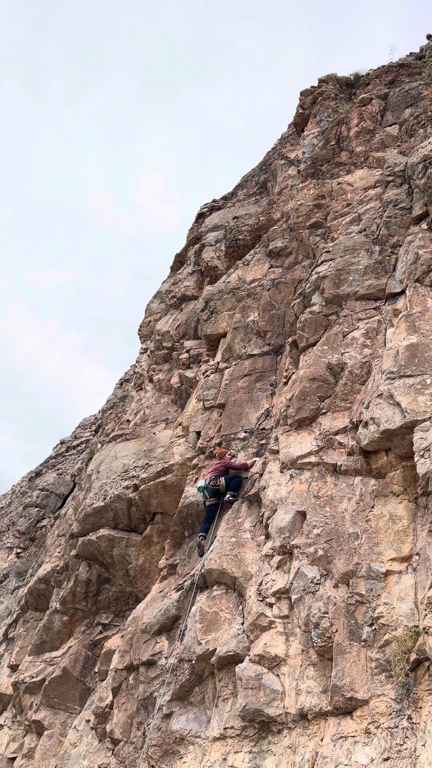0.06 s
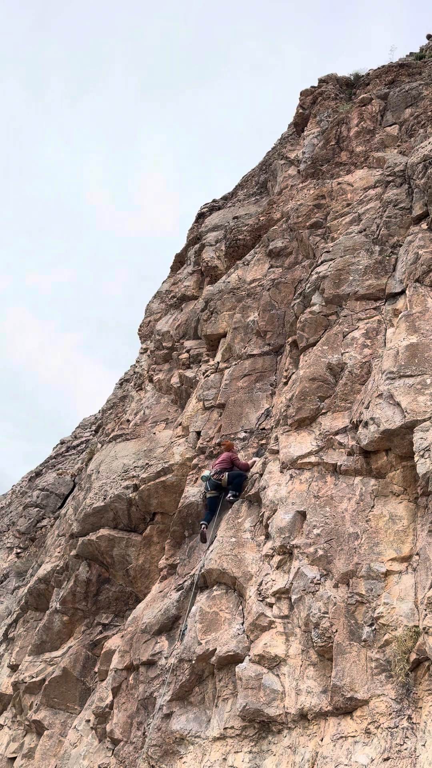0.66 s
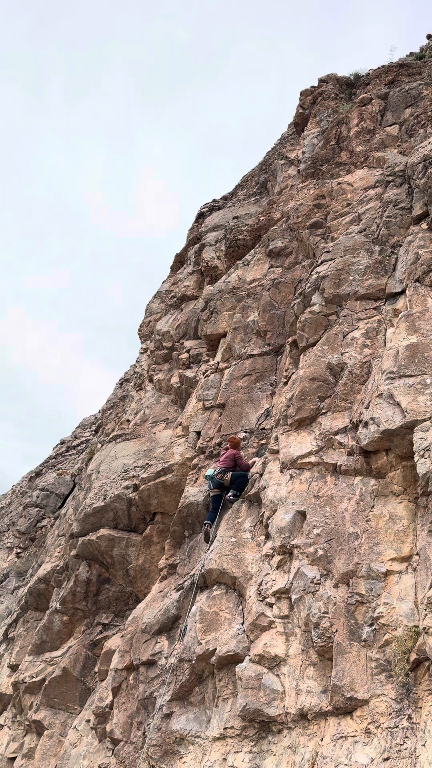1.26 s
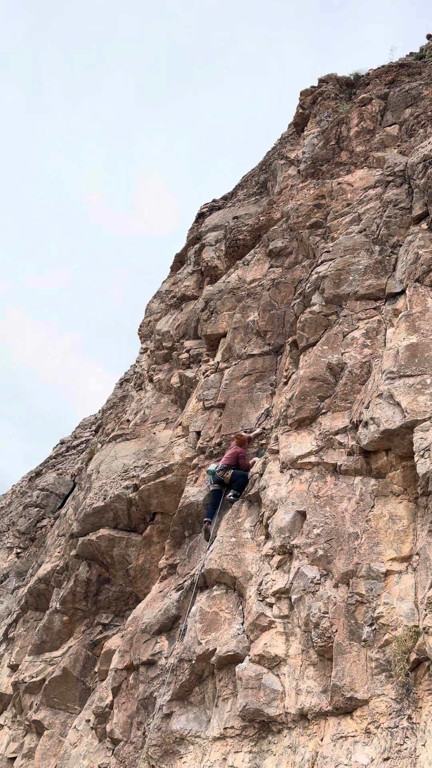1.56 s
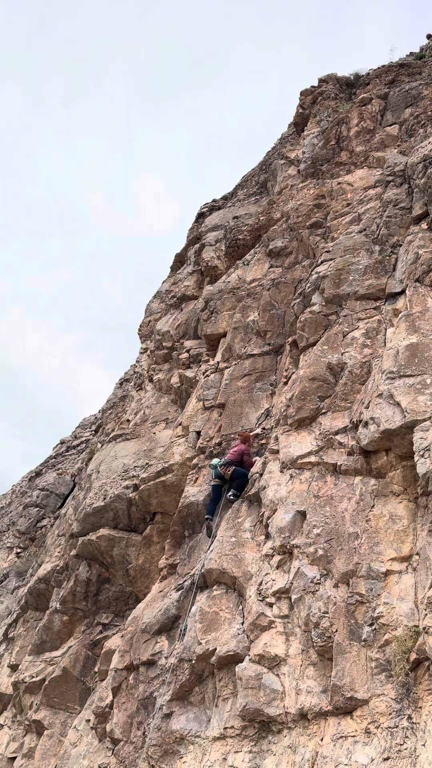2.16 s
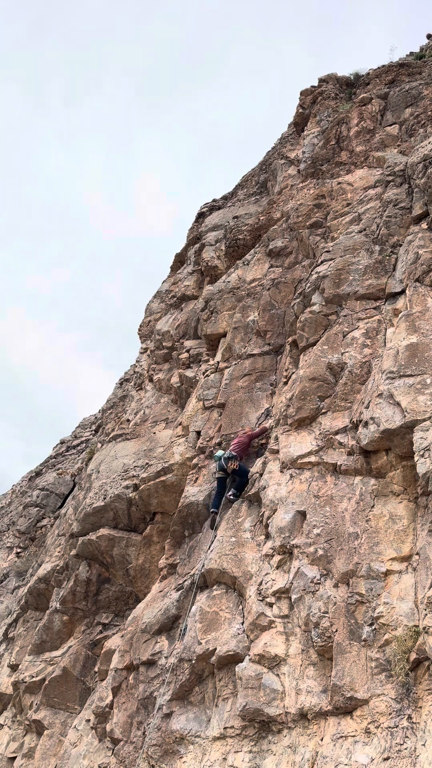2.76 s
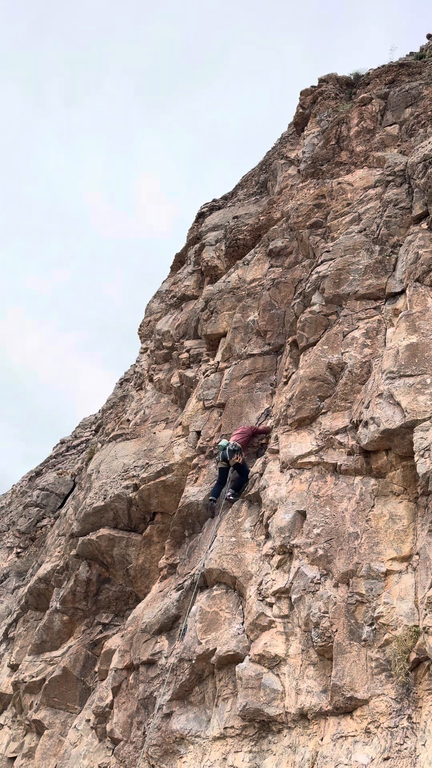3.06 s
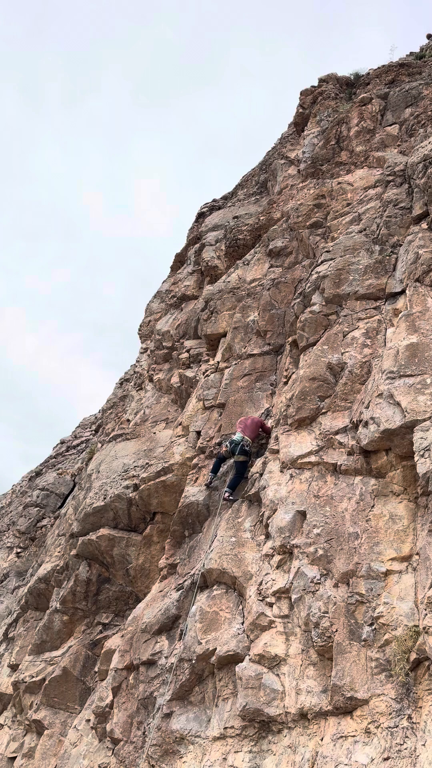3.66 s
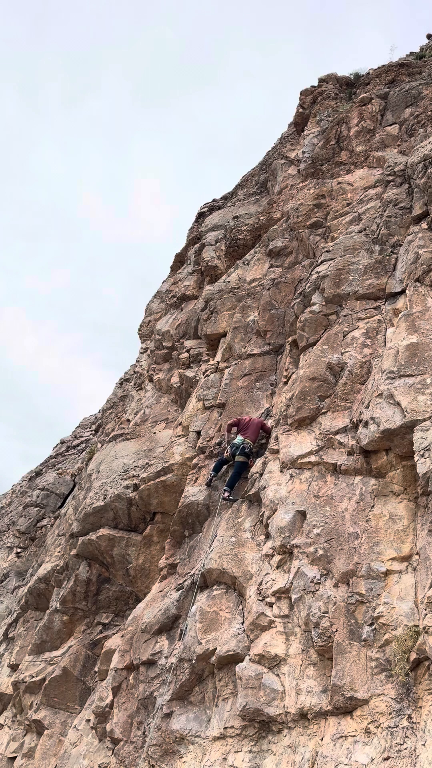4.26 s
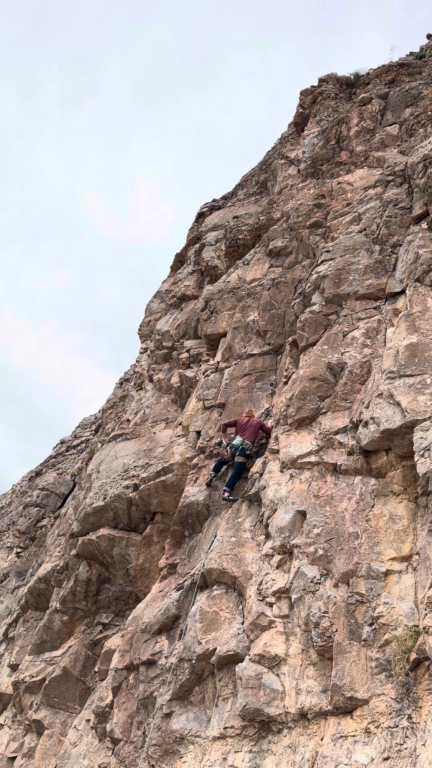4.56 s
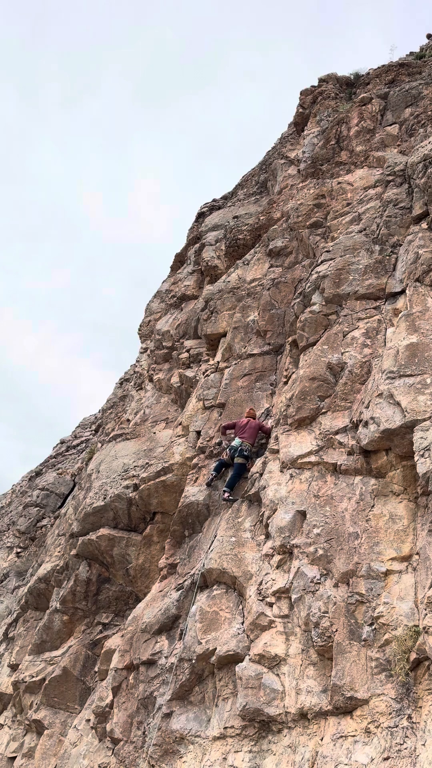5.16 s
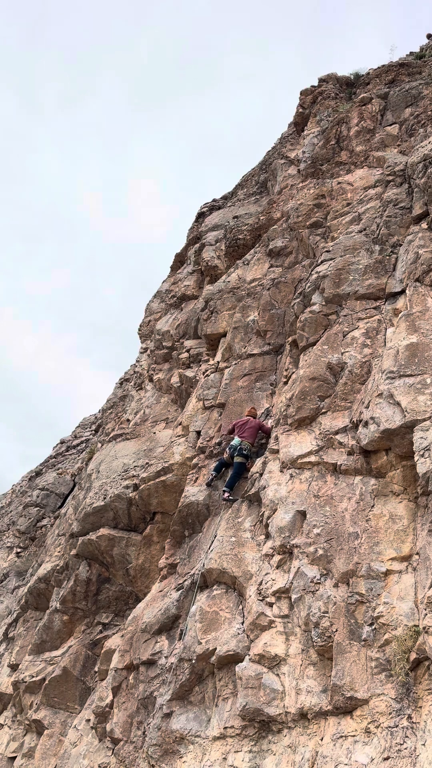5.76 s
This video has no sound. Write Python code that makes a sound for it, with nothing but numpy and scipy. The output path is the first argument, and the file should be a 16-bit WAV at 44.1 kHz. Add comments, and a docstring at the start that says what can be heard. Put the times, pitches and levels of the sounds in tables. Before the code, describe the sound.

Low gusty wind rumble, with quick falling bird chirps, light metal clinks of climbing gear and faint rope rustle.

```python
"""Wind buffets a stereo microphone at the foot of a cliff, over an even rush from far down the valley.
Close by, carabiners knock together and ring, while handled rope and clothing rustle, snap and squeak.
A small bird repeats runs of four falling chirps, which scatter back from the broken rock.
The low rumble is made at the microphone itself, by eddies pushing on its two ports."""
import sys
import numpy as np
from scipy import signal
from scipy.fft import rfft, irfft
from scipy.io import wavfile
from scipy.ndimage import uniform_filter1d

SR = 44100
rng = np.random.default_rng(int(sys.argv[2]) if len(sys.argv) > 2 else 0)


def wav_record(signal):
    """Record a signal, one row per channel, as 16-bit PCM in the file named by sys.argv[1]."""
    frames = np.transpose(np.atleast_2d(signal))
    bounded = np.clip(frames, -1, 1)
    # unit amplitude maps onto the largest positive 16-bit level
    quanta = np.round(bounded * 32767).astype(np.int16)
    wavfile.write(sys.argv[1], SR, quanta)


N = 264585
TIME = np.arange(N) / SR
FREQS = np.maximum(np.arange(N // 2 + 1) * SR / N, 1)


def from_db(db):
    """Decibels to gain."""
    return 10 ** (np.asarray(db) / 20)

def rms_one(x):
    """Scale to unit power."""
    return x / np.sqrt(np.mean(x ** 2) + 1e-20)

def in_time(curve):
    """Read a level curve at every sample."""
    return np.interp(TIME, *np.transpose(curve))

def at_hz(points, hz):
    """Read a table on a log-frequency axis."""
    freqs, values = np.transpose(points)
    return np.interp(np.log(hz), np.log(freqs), values)

def pan(db):
    """Left and right gains for a left-minus-right level."""
    return from_db(np.array([[.5], [-.5]]) * db)

def colour(x, spectrum, skirt_db=30):
    """Filter by a spectrum that falls away by skirt_db an octave beyond its ends."""
    octaves_below = np.maximum(np.log2(spectrum[0][0] / FREQS), 0)
    octaves_above = np.maximum(np.log2(FREQS / spectrum[-1][0]), 0)
    gain_db = at_hz(spectrum, FREQS) - skirt_db * (octaves_below + octaves_above)
    return irfft(rfft(x) * from_db(gain_db), N)

def drift(rate_hz):
    """A random wander of unit power, mostly slower than rate_hz."""
    return rms_one(irfft(rfft(rng.standard_normal(N)) / (1 + (FREQS / rate_hz) ** 2) ** 2, N))

def steadied(x, window_s=.08):
    """Even out the slow swells of a noise, so that the gusts alone shape it."""
    power = uniform_filter1d(np.mean(x ** 2, axis=0), int(window_s * SR))
    return x / np.sqrt(power + 1e-9)


# Lean of the open air across the microphone: freq_hz, left_minus_right_db
BALANCE = [(100, -0.5), (280, 0.5), (600, 3), (1200, 3.5), (2500, 0.5), (6000, 1)]
def air_noise(spectrum, likeness):
    """Stereo noise with a given colour and likeness between the ports."""
    mid, side = rfft(rng.standard_normal((2, N)))
    alike = np.clip(at_hz(likeness, FREQS), -1, 1)
    ports = np.sqrt(1 + alike) * mid + np.sqrt(1 - alike) * side * [[1], [-1]]
    leaning = irfft(ports * pan(at_hz(BALANCE, FREQS)), N)
    return rms_one(colour(leaning, spectrum))


# Gusts on the microphone, and the flutter of their smaller eddies: time_s, level_db
GUST_LEVEL = [(0, -39), (.4, -42.5), (.62, -36.5), (.88, -37.5), (1.05, -41.5), (1.42, -33), (1.6, -47.5),
              (1.75, -37.5), (1.88, -40.5), (2.03, -37), (2.15, -37.5), (2.5, -31.5), (2.8, -41.5),
              (3.05, -37), (3.25, -30), (3.38, -45.5), (3.55, -33.5), (3.8, -39), (3.98, -33.5),
              (4.3, -40.5), (4.55, -34.5), (4.73, -28.5), (4.98, -35.5), (5.05, -46), (5.4, -49),
              (5.95, -40.5)]
FLUTTER_LEVEL = [(0, -58.5), (1.8, -50.5), (2.2, -51.5), (2.33, -45), (2.45, -62), (2.85, -54), (3.5, -51),
                 (3.82, -53.5), (3.94, -41.5), (4.05, -44.5), (4.4, -58), (4.72, -45.5), (4.98, -45),
                 (5.08, -50.5), (5.185, -37), (5.27, -63), (5.9, -45.5)]
# Colour of each: freq_hz, gain_db
RUMBLE = [(20, -24), (30, -12.5), (42, 0.5), (63, 2), (85, 0), (120, -6.5), (165, -22), (200, -28.5)]
FLUTTER = [(70, -16), (120, 2.5), (190, 2.5), (280, -2), (400, -14.5), (600, -50)]
# How alike the two ports hear the wind: freq_hz, correlation
WIND_LIKENESS = [(35, .85), (70, 0.75), (130, -0.15), (300, 0.15)]
# Single eddies striking the ports: centre_s, level_db, pitch_hz, half_length_s
BUFFETS = [(1.139, -17.5, 50.3, 0.0079), (1.365, -16, 56, 0.019), (2.019, -23, 79.5, .007),
           (2.328, -27, 132, 0.018), (2.339, -9.5, 52.8, 0.026), (2.491, -11, 65, 0.0063),
           (2.604, -16.5, 63.4, 0.0097), (2.923, -19, 61.2, 0.038), (3.545, -18, 67.4, 0.057),
           (3.96, -8, 63.6, 0.005), (4.049, -14.5, 95, 0.0055), (4.147, -8.5, 66, 0.017),
           (4.378, -17, 65.7, 0.024), (4.608, -17.5, 78, 0.015), (4.648, -8, 296, 0.003),
           (4.656, -25.5, 218, 0.017), (4.723, -9.5, 70, 0.012), (4.758, -16.5, 114, 0.018),
           (4.789, -15, 75.6, 0.0056), (4.892, -8, 87.4, 0.0068), (4.919, -15, 68.4, 0.023),
           (4.949, -16.5, 101.4, 0.022), (4.967, -13.5, 209.5, 0.0034), (4.987, -18.5, 129.4, 0.012),
           (5.187, -16, 210, 0.0019), (5.191, -24.5, 70, 0.036)]
def wind():
    """Turbulence right at the ports: deep rumble, lumpy flutter and single eddies of a few swings."""
    rumble_db = in_time(GUST_LEVEL) + 1.5 + 2.5 * drift(12.7)
    out = from_db(rumble_db) * steadied(air_noise(RUMBLE, WIND_LIKENESS))
    flutter_db = in_time(FLUTTER_LEVEL) + 4 * drift(24)
    out += from_db(flutter_db) * steadied(air_noise(FLUTTER, WIND_LIKENESS))
    for centre, db, hz, half in BUFFETS:
        t = TIME - centre
        port_phase = rng.normal(0, .27, (2, 1))
        out += from_db(db - 7) * np.exp(-(t / half) ** 2) * np.cos(2 * np.pi * hz * t + port_phase)
    return out


# Air streaming across the microphone: time_s, level_db
CROSSFLOW_LEVEL = [(0, -72), (.9, -70), (1.45, -49), (1.8, -66), (2.2, -49), (2.55, -41), (2.8, -44.5),
                   (3.25, -43.5), (3.55, -47), (3.95, -44.5), (4.3, -45), (4.85, -42.5), (5.1, -58.5),
                   (5.3, -56), (5.55, -46), (5.9, -44)]
# Its colour: freq_hz, gain_db
CROSSFLOW = [(110, -3.5), (200, -1), (330, -2.5), (480, -11), (700, -18.5), (1000, -22)]
def crossflow():
    """Passing air pushes on one port as it pulls on the other: a hollow, wide rush."""
    stream = rms_one(colour(rng.standard_normal(N), CROSSFLOW))
    return from_db(in_time(CROSSFLOW_LEVEL) + 1.5 * drift(20)) * stream * [[1], [-1]]


# The valley from a distance, lower and upper rush: time_s, level_db
RUSH_LEVEL = [(0, -48), (.45, -49.5), (.9, -49.5), (2, -49), (3.15, -51), (3.5, -47), (3.8, -49.5),
              (4.15, -51), (6, -51)]
UPPER_RUSH_LEVEL = [(0, -55), (.3, -53), (.85, -55), (1.2, -54), (1.6, -54.5), (1.87, -53.5), (2.7, -55.5),
                    (2.92, -53.5), (3.15, -58), (3.38, -53), (3.65, -53.5), (4.15, -56.5), (4.8, -56.5),
                    (5.3, -55), (5.55, -53.5), (6, -56)]
# Colour of each, and of the hiss above them: freq_hz, gain_db
RUSH = [(88, -39.5), (150, -9), (173, -2), (367, 0.5), (404, -3.5), (472, -1.5), (513, -5), (592, -5),
        (659, -2), (734, -3.5), (798, -5), (977, -31), (1300, -39)]
UPPER_RUSH = [(700, 1.5), (900, 1.5), (1080, -0.5), (1400, -7), (2000, -15), (2600, -24), (3380, -51.5)]
HISS = [(2200, 1), (3200, -4), (5000, -21), (8800, -23.5), (10300, -35), (15000, -38)]
# How alike the two ports hear the distance: freq_hz, correlation
FAR_LIKENESS = [(130, .3), (300, 0.82), (430, 0.8), (700, 0.045), (1200, 0.62), (2500, 0.44), (8000, -.8)]
# Far-off drones: centre_s, half_length_s, pitch_hz, width_hz, level_db
DRONES = [(.35, 0.085, 770, 25, -49), (0.603, 0.25, 350, 26, -49.5), (1.95, 0.42, 660, 51, -58.5),
          (2.698, 1.9, 477.6, 11, -58), (3.918, 0.11, 727, 78, -55)]
def valley():
    """A far rush whose upper part swells on its own, thin hiss, and faint drones that come and go."""
    out = from_db(in_time(RUSH_LEVEL) + 2) * air_noise(RUSH, FAR_LIKENESS)
    out += from_db(in_time(UPPER_RUSH_LEVEL) + .78) * air_noise(UPPER_RUSH, FAR_LIKENESS)
    out += from_db(-78) * air_noise(HISS, FAR_LIKENESS)
    for centre, half, hz, width, db in DRONES:
        resonance = 1 / (1 + (2 * (FREQS - hz) / width) ** 2)
        drone = rms_one(irfft(rfft(rng.standard_normal((2, N))) * resonance, N))
        swell = from_db(db) * np.exp(-((TIME - centre) / half) ** 2)
        out += swell * pan(at_hz(BALANCE, hz)) * drone
    return out


# Sound reaching the microphone from the cliff side: freq_hz, left_lag_rad
PORT_LAG = [(2000, .1), (5800, 0.84), (8500, 1.71), (10500, 2.8), (13500, 3.76), (15300, 3.6)]
def at_ports(x):
    """Sound from the cliff side reaches the right port first."""
    left = irfft(rfft(x) * np.exp(-1j * at_hz(PORT_LAG, FREQS)), N)
    return np.array([left, x])

def rock_scatter(x, t60_s, build_s):
    """Many small reflections from broken rock, different at each port."""
    t = TIME[:SR // 2]
    facets = rng.standard_normal((2, len(t))) * (rng.random((2, len(t))) < .2)
    echo = facets * from_db(-60 * t / t60_s) * np.clip(t / build_s, 0, 1) ** 2
    echo /= np.sqrt(np.sum(echo ** 2, axis=1, keepdims=True))
    return signal.fftconvolve(np.atleast_2d(x), echo, axes=1)[:, :N]

def strikes(starts, db):
    """One impulse for each contact."""
    out = np.zeros(N)
    np.add.at(out, np.round(starts * SR).astype(int), from_db(db))
    return out

def bursts(impulses, t60_s):
    """Each impulse sets off a dying puff of noise."""
    envelope = signal.lfilter([1], [1, -from_db(-60 / (t60_s * SR))], impulses + 1e-18)
    return envelope * rng.standard_normal(N)

def add_ring(out, start_s, hz, db, t60_s):
    """Struck metal rings: add one dying sine for each mode."""
    t = TIME[:SR // 5, None]
    ring = np.sum(from_db(db - 60 * t / t60_s) * np.sin(2 * np.pi * hz * t), axis=1)
    stretch = out[int(start_s * SR):][:len(t)]
    stretch += ring[:len(stretch)]


# Metal on metal, close to the microphone; the four parts' levels are relative to level_db:
# start_s, level_db, gate_db, frame_db, knock_db, edge_db, gate_hz, spine_hz
CLINKS = [(.144, -60.5, 0, 1, 5, -5, 6580, 8500), (0.153, -61, -11, -6, -6, 4, 6200, 8500),
          (0.441, -51, -6, -1, -15, -4, 6860, 8320), (.626, -53.5, 7, -4, -1, 10, 7100, 8440),
          (.671, -56.5, -8, -3, -11, 6, 6700, 8850), (1.056, -45.5, 13.5, 0, -8, 1, 6620, 8770),
          (2.3129, -46.5, -5, -7, -17, -4, 6260, 8320), (2.357, -51, 3, -2, 1, -2, 5990, 8100),
          (2.3751, -47, -5, -8, 7, 3, 6370, 8340), (2.495, -45, 6, -10, 0.5, -9, 7220, 8200),
          (2.561, -53, -2, -1, -5, -3, 6800, 8600), (2.972, -65, 7, -6, -11, 3, 6570, 8600),
          (3.429, -61, 0, -8, -2, 7, 6200, 8400), (3.445, -42.5, -8, -10, -4, -2, 5900, 8100),
          (3.6594, -58, -2, -2, 2, 3, 6450, 8350), (3.863, -57, -12, 1, -12, 2, 6800, 8350),
          (3.876, -51.5, -3, 3, -19, 8, 6660, 8680), (3.911, -48, 2, 1, -9, -1, 7400, 8600),
          (3.9977, -59.5, 11, -12, 7, -8, 5550, 8100), (4.311, -46.5, -16, -6, -17, -9, 7580, 8800),
          (4.477, -40.5, -1, -8, 2.5, -3, 5670, 8360), (4.6257, -49.5, -13, -6, -2, -5.5, 6500, 8450),
          (5.0773, -45.5, 2, 4.5, -3, -10, 6700, 8290), (5.127, -48, -3, 0, -3, 3, 6940, 8560),
          (5.231, -54.5, -13, 2.5, 0, -2, 6540, 8300), (5.303, -63, -8, 7, -2, -10, 6400, 8240),
          (5.4277, -36.5, -2, -1, -1, 1, 7450, 8140), (5.438, -45, -6, 2, -8, 7, 6500, 8300),
          (5.5245, -64, -7, -12, -4, -8, 6400, 8290), (5.5388, -32.5, -13, 4, -9, 0, 6700, 8320),
          (5.899, -48, 8.5, 0, 2.5, -2, 6640, 8430), (5.968, -56, 2, -4, 7, -14, 6300, 8300),
          (5.986, -58.5, 3, -6, 17.5, -13, 6800, 8500)]
# Colour of a contact's tick, dull knock and bright edge: freq_hz, gain_db
TICK = [(2000, 0), (3000, -16.5), (4600, -22.5), (6500, -2), (8500, 12), (10500, 4.5), (12500, -14.5),
        (15000, -9.5), (16500, -39)]
KNOCK = [(2200, -6.5), (3000, -5.5), (4800, 1), (6200, 5), (7500, -9)]
EDGE = [(11000, 0), (12900, 3), (13700, 3), (14800, -1), (16000, 4)]
# Modes that all the carabiners share: pitch_hz, level_db, t60_s
FRAME = [(2740, -28.5, .08), (4560, -4, 0.032), (9800, -20, 0.065)]
WIRE = [(13100, -10, .02), (14300, -5, .025), (14800, -8, .025)]
# Modes whose pitch differs from piece to piece: pitch_ratio, level_db, t60_s
SPINE = [(.985, -3, 0.062), (1, 0, 0.06), (1.035, -19, 0.05)]
GATE = [(.81, -24, 0.024), (.88, -26.5, 0.068), (1, -4.5, .058), (1.09, -11, 0.04), (1.33, -17, 0.032)]
def carabiners(detune=.006, spread_db=2.2, jingle_modes=12):
    """Carabiners knock together: a crack, a grainy chatter, then the parts ring and nearby gear jingles."""
    starts, db, gate_db, frame_db, knock_db, edge_db, gate_hz, spine_hz = np.transpose(CLINKS)
    blows = strikes(starts, db)
    crack = from_db(-11) * bursts(blows, t60_s=.009)
    chatter = from_db(-7.5) * bursts(blows, t60_s=.045)
    catches = rms_one(from_db(5.5 * drift(350)))   # rough surfaces touch unevenly
    out = colour(crack + chatter * catches, TICK)
    out += colour(bursts(strikes(starts, db + knock_db), t60_s=.02), KNOCK)
    out += colour(bursts(strikes(starts, db + edge_db), t60_s=.014), EDGE)
    unscaled = np.ones(len(starts))
    for modes, pitches, part_db in ((FRAME, unscaled, frame_db), (SPINE, spine_hz, frame_db),
                                    (GATE, gate_hz, gate_db), (WIRE, unscaled, edge_db)):
        partials, mode_db, t60_s = np.transpose(modes)
        for start, pitch, level_db in zip(starts, pitches, db + part_db - 6.5):
            force, shift = rng.standard_normal((2, len(modes)))
            hz = pitch * partials * (1 + detune * shift)
            add_ring(out, start, hz, level_db + mode_db + spread_db * force, t60_s)
    for start, level_db in zip(starts, db):
        jingle_hz = rng.uniform(2620, 10010, jingle_modes)
        jingle_db = level_db + rng.uniform(-26, -18, jingle_modes)
        add_ring(out, start, jingle_hz, jingle_db, t60_s=.054)
    echo = rock_scatter(out, t60_s=.27, build_s=.006)
    return at_ports(out) + colour(echo, [(2000, -7.5), (9000, -13), (11500, -25.5), (16000, -19.5)])


# A small bird by the cliff; a run is a soft lead-in and three full notes, at times with a stray peep:
# start_s, length_s, pitch_hz, level_db, overtone_db
CHIRPS = [(0.249, 0.023, 3660, -50.5, -57), (0.3162, 0.037, 3845, -39.5, -53),
          (0.401, 0.038, 3890, -37, -53.5), (0.4945, 0.039, 3860, -37.5, -54),
          (1.154, 0.035, 3300, -66, -94), (1.201, 0.022, 3740, -48.5, -55), (1.2634, 0.039, 3840, -41, -55),
          (1.345, 0.041, 3850, -39, -55), (1.4438, 0.04, 3860, -38.5, -55),
          (3.025, 0.018, 3480, -57.5, -63.5), (3.088, 0.041, 3770, -44, -51),
          (3.1712, 0.037, 3830, -38.5, -54.5), (3.266, 0.033, 3850, -37.5, -54),
          (4.261, 0.022, 3620, -53.5, -62), (4.325, 0.04, 3805, -42.5, -53),
          (4.4068, 0.041, 3850, -38.5, -54), (4.5, 0.042, 3850, -38, -53.5),
          (5.34, 0.024, 3730, -48.5, -54), (5.4076, 0.0354, 3830, -40.5, -58),
          (5.4922, 0.041, 3880, -38.5, -54), (5.5865, 0.035, 3870, -37, -52.5),
          (5.615, 0.024, 3110, -51, -79)]
# Course of one chirp: length_share, pitch_ratio, fundamental_db, octave_db, top_db
CHIRP_SHAPE = [(0, 1.13, -9, -8, -18), (.09, 1.008, -1.5, -3, -9), (.3, .996, .7, -13, -5),
               (.48, .983, -.6, -4, -2), (.66, .96, -4.5, 3.5, -2.5), (.77, .936, -7.5, 0, -8),
               (.88, .905, -10, -15, -24), (1, .87, -21, -28, -36)]
# Its harmonics at the microphone, lowest first: level_db, left_minus_right_db, left_lag_rad
HARMONICS = [(-5.5, -5.5, 1.32), (-2.5, 0, 1.5), (-10.5, 1, 3.1), (-4, -0.5, 4.4)]
# Colour of its rasp: freq_hz, gain_db
RASP = [(3300, -1), (5500, -5.5), (7500, -15), (9000, -15), (12500, -1), (14200, 1), (15800, 8)]
def bird(full_voice_db=-42, full_length_s=.032, fade_share=.025, click_s=.0015):
    """Each chirp opens with a tiny click and drops in pitch as its overtones swell, wrapped in rasp."""
    out, rasp_level = np.zeros((2, N)), np.zeros(N)
    share, ratio, fundamental_db, octave_db, top_db = np.transpose(CHIRP_SHAPE)
    quiver, flicker_db = drift(540), 2.8 * drift(600)
    for start, length, hz, db, overtone_db in CHIRPS:
        span = slice(int(start * SR), int((start + length) * SR))
        progress = np.linspace(0, 1, len(TIME[span]))
        waver = .0093 * from_db(.8 * (full_voice_db - db))   # soft notes waver more
        fall_depth = min(length / full_length_s, 1) * rng.normal(1, .1)
        pitch = hz * np.interp(progress, share, ratio) ** fall_depth * (1 + waver * quiver[span])
        phase = 2 * np.pi * np.cumsum(pitch) / SR
        fade = np.clip(np.minimum(progress, 1 - progress) / fade_share, 0, 1)
        courses_db = [db + np.interp(progress, share, fundamental_db)]
        for swell_db in (octave_db, top_db):
            warped = progress ** np.exp(rng.normal(0, .16))   # the swell comes early or late
            courses_db.append(overtone_db + np.interp(warped, share, swell_db) + flicker_db[span])
        courses_db.append(courses_db[-1])   # the top two harmonics swell together
        for k, ((harmonic_db, side_db, lag), course_db) in enumerate(zip(HARMONICS, courses_db), 1):
            tone = np.sin(k * phase - np.array([[lag], [0]]))
            out[:, span] += fade * from_db(harmonic_db + course_db) * pan(side_db) * tone
        rasp = from_db(-9) * fade * np.sqrt(1 - progress)
        click = from_db(-4) * np.exp(-progress * length / click_s)
        rasp_level[span] = from_db(overtone_db) * (rasp + click)
    out += at_ports(rms_one(colour(rng.standard_normal(N), RASP)) * rasp_level)
    # the rock returns the fundamental more than the overtones
    rock_colour = [(3000, -11), (3550, -7.5), (3870, -11.5), (4500, -5), (7500, -17.5), (15000, -23.5)]
    return out + colour(rock_scatter(out, t60_s=.14, build_s=.031), rock_colour)


# Rope and webbing snapping taut near the microphone: start_s, level_db, thud_relative_db
SNAPS = [(0.609, -48.5, -18), (0.742, -51.5, -2.5), (1.89, -51, -9.5), (2.243, -51, -10), (2.147, -74, -12),
         (2.299, -59, -1), (2.383, -44.5, -12), (2.638, -52, -24), (2.657, -59, -5), (2.9813, -53, -24),
         (3.431, -58, 5), (3.5664, -49, -23), (3.603, -50, -28), (3.656, -57.5, 0.5), (4.062, -51.5, -23),
         (4.257, -46, -38), (5.107, -56, -1), (5.839, -51.5, -13)]
# Longer slides of rope: centre_s, half_length_s, level_db
SLIDES = [(.68, 0.096, -75), (.96, 0.059, -79), (1.35, 0.07, -88), (1.6, 0.039, -74.5),
          (2.16, 0.088, -72.5), (2.385, 0.045, -65), (3.08, 0.12, -90), (3.325, 0.02, -69.5),
          (4.16, 0.021, -72), (4.75, 0.051, -80), (5.09, 0.054, -73), (5.3, 0.028, -76), (5.62, 0.03, -74),
          (5.975, 0.014, -65)]
# Colour of the cloth and of the sand in the rope: freq_hz, gain_db
CLOTH = [(1800, 6.5), (3000, 4.5), (4500, 2.5), (5800, 6), (7000, 3), (8900, 6), (10400, -4),
         (12000, -13.5), (14800, -9.5), (16500, -36)]
GRIT = [(2500, -8.5), (6000, -1.5), (9000, 0.5), (11500, -11.5), (14800, -1), (16500, -27)]
def rope(grit_loosens_db=-70):
    """Handled rope and cloth rustle, hard rubbing loosens grit, and now and then webbing snaps taut."""
    starts, db, thud_db = np.transpose(SNAPS)
    snaps = from_db(-9.5) * bursts(strikes(starts, db), t60_s=.05)
    thuds = bursts(strikes(starts, db + thud_db), t60_s=.022)
    rubbing = handling(SLIDES, contacts=list(CLINKS) + list(SNAPS))
    loosened = np.minimum(rubbing / from_db(grit_loosens_db), 1)
    out = colour(rubbing * fibres() + snaps, CLOTH)
    out += colour(rubbing * loosened * grit(), GRIT)
    out += colour(thuds, [(1800, 14), (3200, 11.7), (5000, 1.8)]) + squeaks()
    return at_ports(out) + from_db(-10) * rock_scatter(out, t60_s=.089, build_s=.0022)

def handling(slides, contacts, drag_lag_s=.0093, drag_half_s=.024, middling_db=-43):
    """How hard rope and cloth rub: long slides, a short drag with every contact, and faint fidgeting."""
    drags = [(start + drag_lag_s, drag_half_s, -72 + .83 * (db - middling_db))
             for start, db, *_ in contacts]
    power = from_db(-85.5 - 3 * drift(13)) ** 2   # fidgeting
    for centre, half, db in list(slides) + drags:
        power += from_db(db) ** 2 * np.exp(-np.minimum(((TIME - centre) / half) ** 2, 20))
    return np.sqrt(power)

def fibres(grain_db=5.5):
    """Fibres of every size catch and slip, each size in grains of its own."""
    edges_hz = np.geomspace(1500, 16000, 17)
    white, out = rng.standard_normal((2, N)), np.zeros(N)
    for k, band in enumerate(zip(edges_hz, edges_hz[1:])):
        grains = white[k % 2] * from_db(grain_db * drift(130))
        out += signal.sosfilt(signal.butter(2, band, "band", fs=SR, output="sos"), grains)
    return rms_one(out)

def grit(ticks_per_s=130):
    """Specks of sand in the rope give way in separate, very short ticks."""
    specks = (rng.random(N) < ticks_per_s / SR) * rng.uniform(0, 1, N) ** 2
    return rms_one(bursts(specks, t60_s=.004))


# Rope squeaking under load, close by: centre_s, half_length_s, pitch_hz, rise_hz_per_s, level_db
SQUEAKS = [(.73, 0.017, 3100, 3, -65), (2.35, 0.0091, 6020, -8000, -58.5), (4.705, 0.003, 5400, 4, -67),
           (5.849, 0.014, 1706, 6997, -54.5)]
def squeaks():
    """Stick and slip locks for a moment into a wavering tone."""
    out, waver = np.zeros(N), 1 + .05 * drift(600)
    for centre, half, hz, rise, db in SQUEAKS:
        t = TIME - centre
        phase = 2 * np.pi * np.cumsum((hz + rise * t) * waver) / SR
        out += from_db(db) * np.exp(-(t / half) ** 2) * np.sin(phase)
    return out


def scene():
    """Everything that reaches the microphone at the foot of the cliff."""
    return wind() + crossflow() + valley() + carabiners() + bird() + rope()

def record(dry, bass_cut_hz=30, top_cut_hz=16050):
    """The recorder thins the deepest bass and cuts the top steeply."""
    thinned = signal.sosfilt(signal.butter(1, bass_cut_hz, "high", fs=SR, output="sos"), dry)
    return signal.sosfilt(signal.ellip(10, .1, 80, top_cut_hz, fs=SR, output="sos"), thinned)


dry = scene()
out = record(dry)
wav_record(out)
```